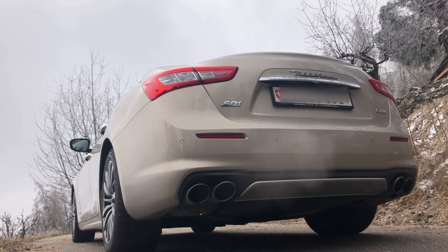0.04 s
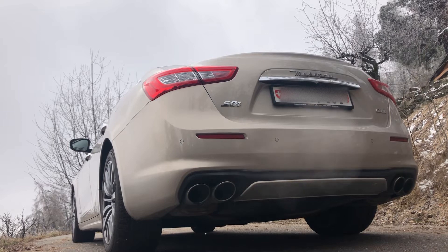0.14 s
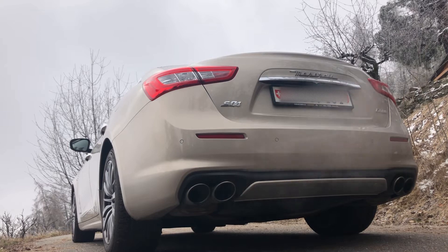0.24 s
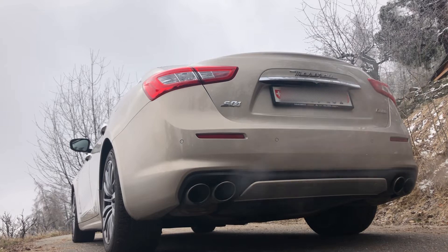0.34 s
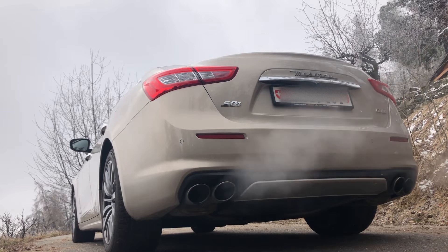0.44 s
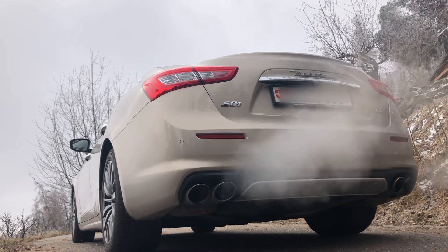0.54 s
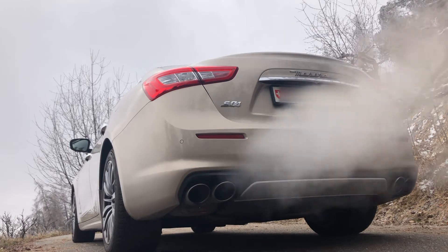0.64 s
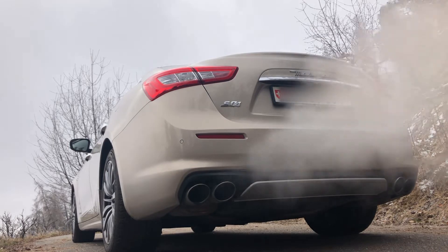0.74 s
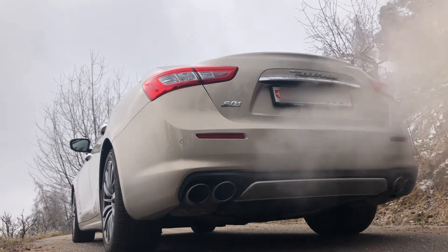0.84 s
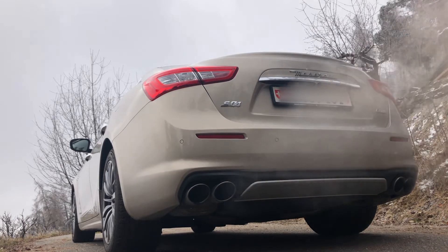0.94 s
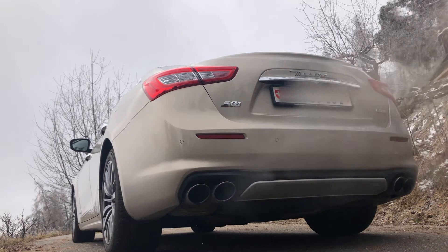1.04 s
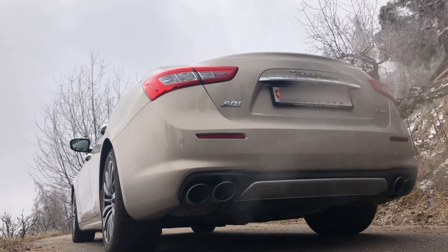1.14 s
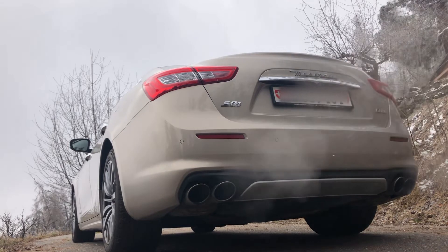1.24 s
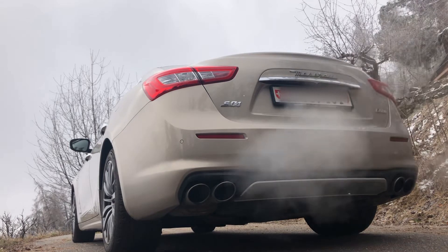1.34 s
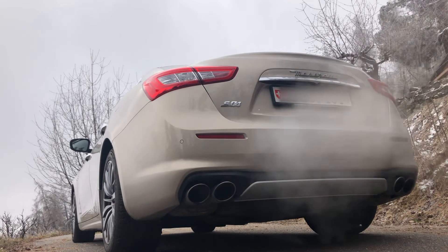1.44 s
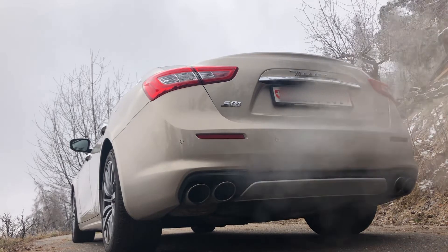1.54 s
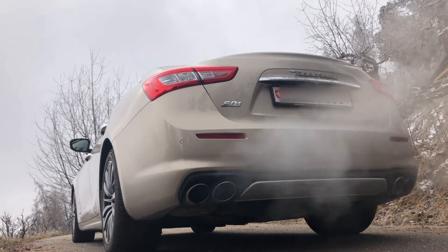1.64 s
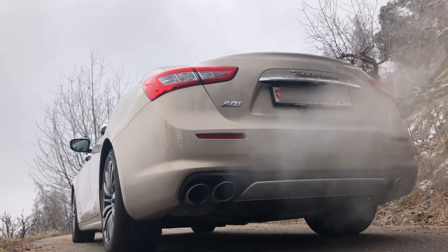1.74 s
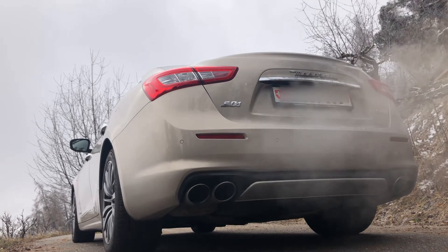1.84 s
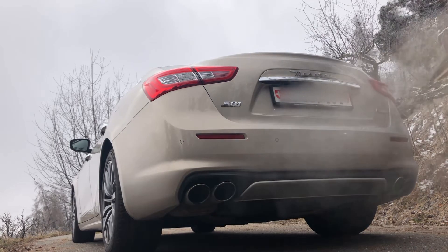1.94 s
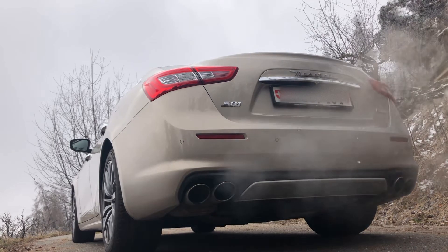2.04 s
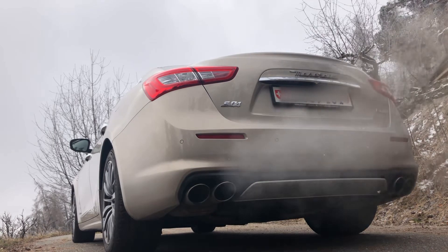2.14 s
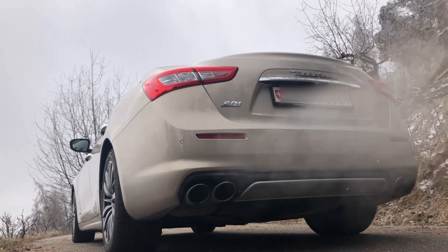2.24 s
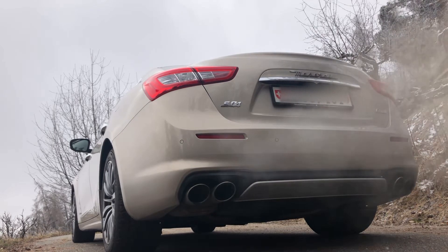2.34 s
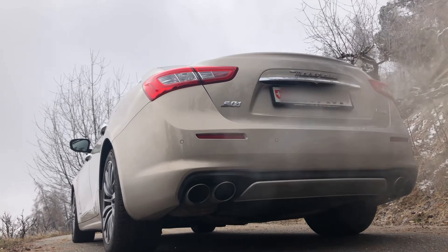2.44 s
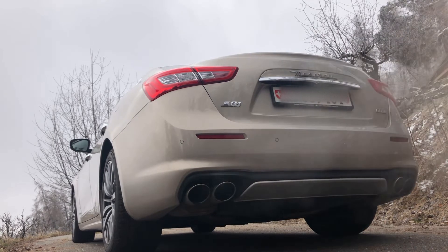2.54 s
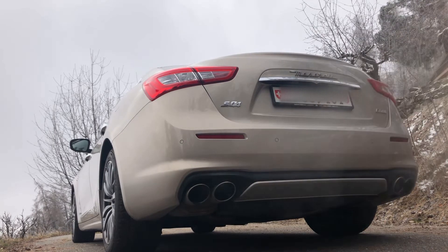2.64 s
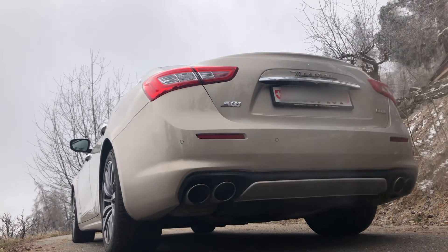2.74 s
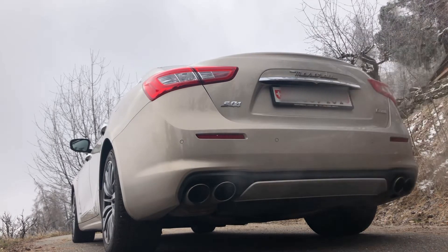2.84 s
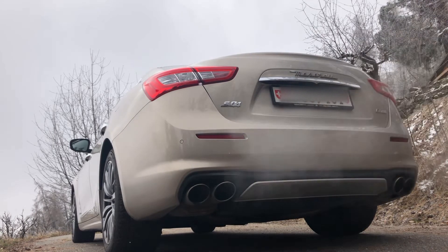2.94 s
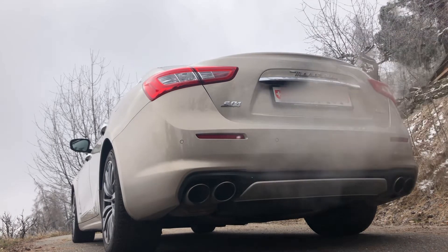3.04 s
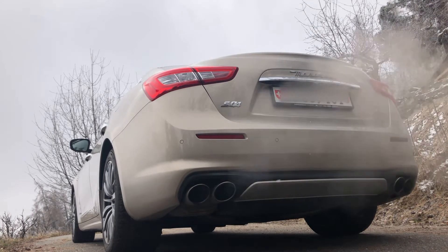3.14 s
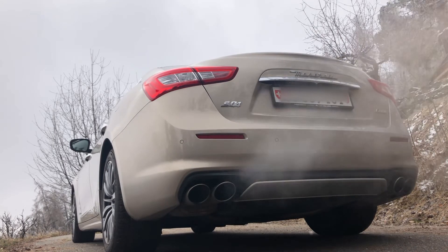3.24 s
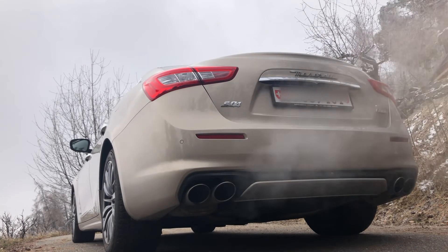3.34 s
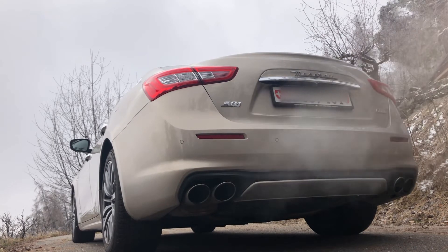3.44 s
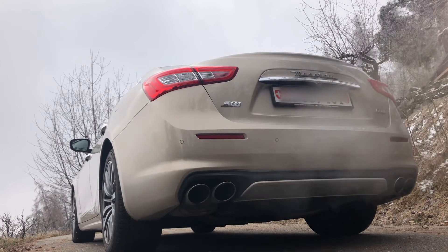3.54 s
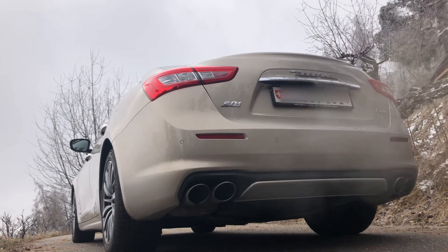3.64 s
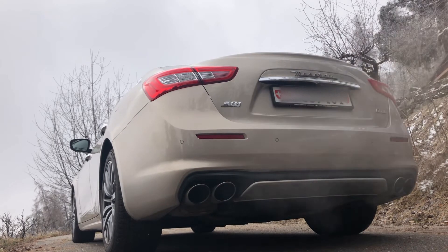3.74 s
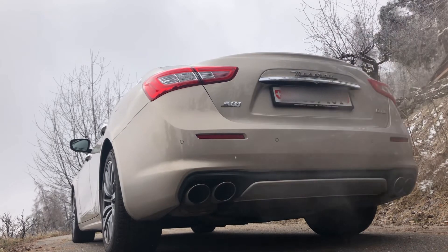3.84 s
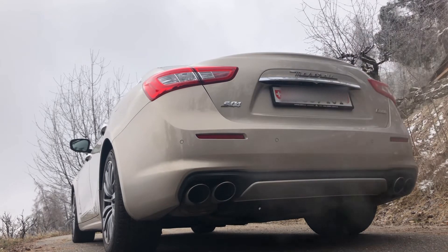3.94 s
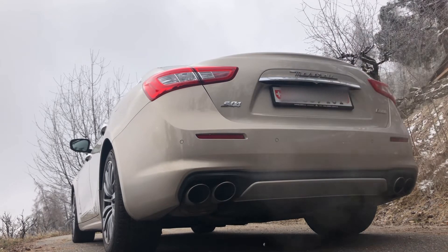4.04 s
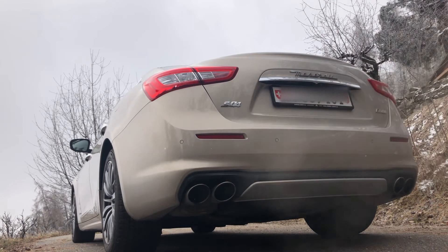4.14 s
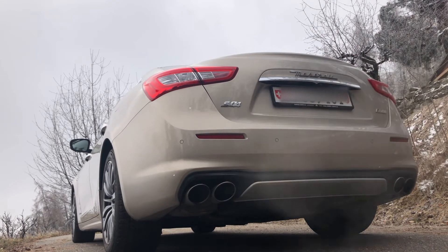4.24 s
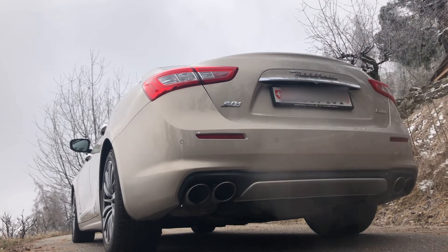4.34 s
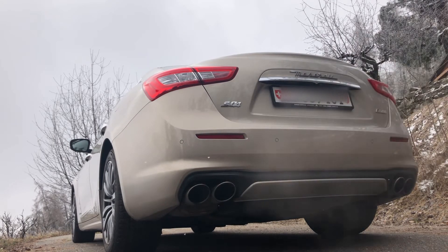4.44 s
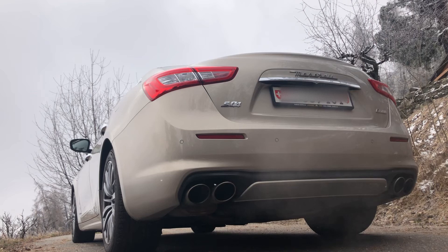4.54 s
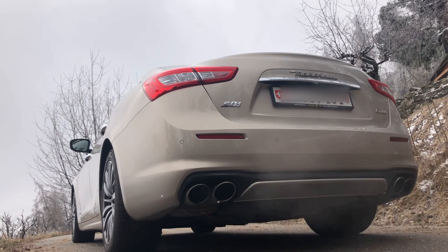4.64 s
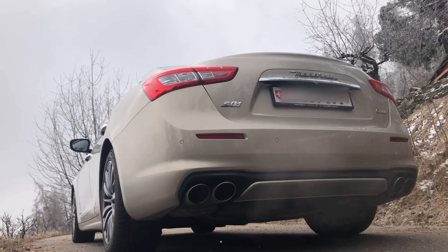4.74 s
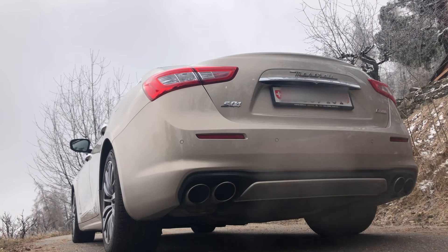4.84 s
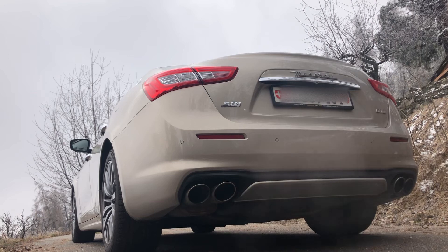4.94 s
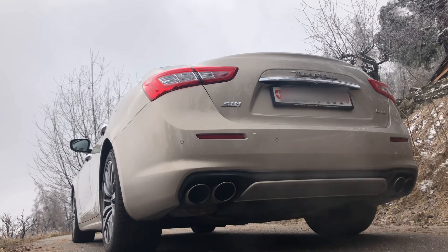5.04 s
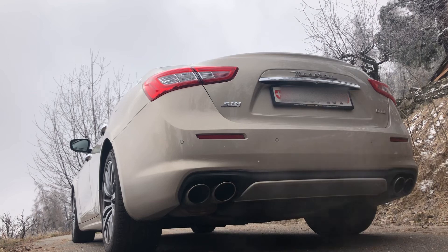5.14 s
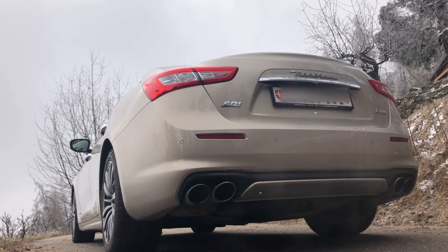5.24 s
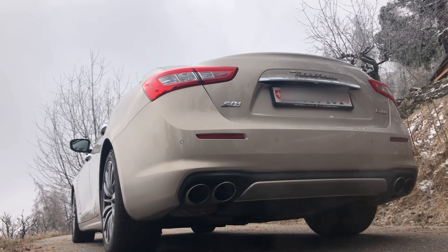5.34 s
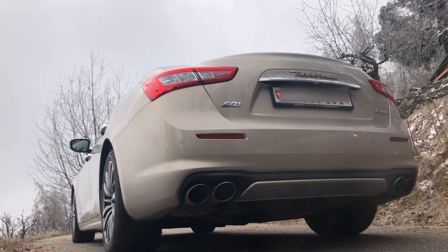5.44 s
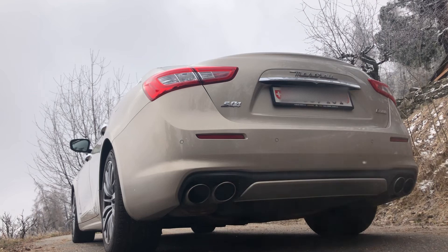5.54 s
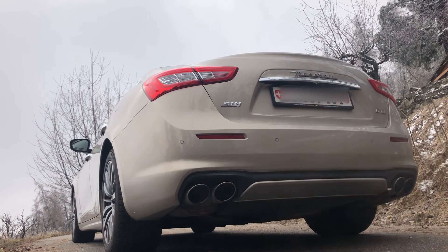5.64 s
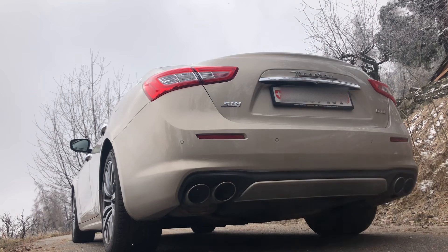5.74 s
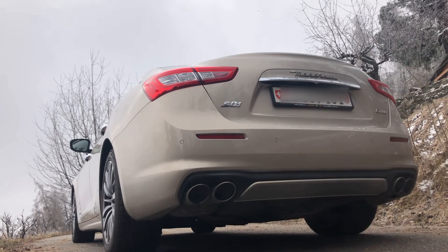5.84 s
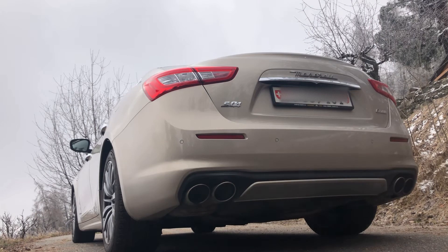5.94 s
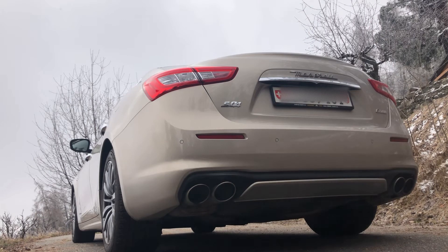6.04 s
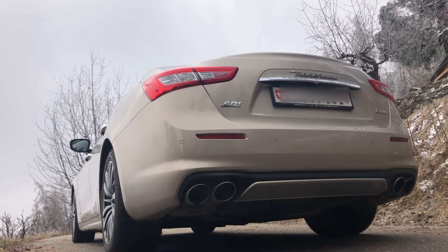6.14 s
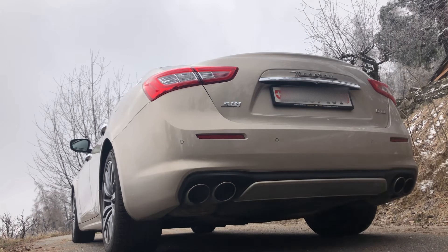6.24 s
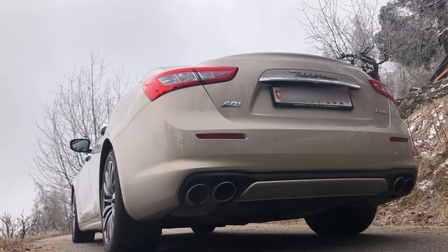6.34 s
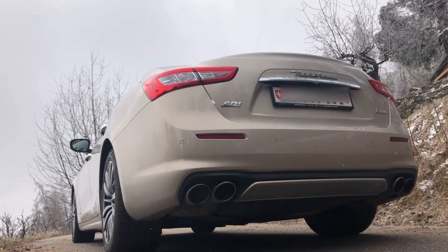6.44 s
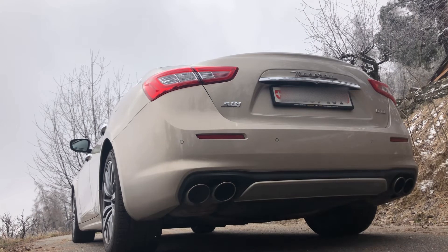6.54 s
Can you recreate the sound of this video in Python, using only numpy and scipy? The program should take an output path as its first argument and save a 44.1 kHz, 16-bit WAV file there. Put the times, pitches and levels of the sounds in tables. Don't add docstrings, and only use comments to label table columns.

```python
import sys
import numpy as np
from scipy import signal
from scipy.fft import rfft, irfft
from scipy.io import wavfile
from scipy.ndimage import uniform_filter1d

SR = 44100
rng = np.random.default_rng(int(sys.argv[2]) if len(sys.argv) > 2 else 0)


def output_pcm(signal):
    pcm = np.clip(np.atleast_2d(signal).T, -1, 1) * 32767
    wavfile.write(sys.argv[1], SR, np.round(pcm).astype(np.int16))


def level_to_linear(level):
    exponent = np.asarray(level, float) / 20
    return 10 ** exponent


N = 291060
TIME = np.arange(N) / SR

# frequency in Hz, level in dB.
AIR_SPECTRUM = [(25, -20), (60, -3), (800, -12), (3000, -22), (15000, -33)]
# time in seconds, firing rate of one bank in Hz.
BANK_RATE = [(0, 55.95), (.35, 93.76), (.51, 117.7), (.7, 116.6), (1.12, 95.5), (1.47, 127.4),
             (1.68, 125.5), (1.97, 112.2), (2.17, 127.9), (2.43, 125.9), (2.81, 110.6), (3.0, 125.9),
             (3.2, 128.5), (3.77, 101.8), (4.63, 70.11), (5.39, 47.61), (5.88, 33.41), (6.6, 36.33)]
# pedal down, rev cut starts, pedal up, all in seconds,
# pipe level at the start in dB, pipe level at the end in dB.
BLIPS = [
    (-.2, 0.626, 0.7, -14.5, -8),
    (1.122, 1.526, 1.685, -8.5, -13),
    (1.937, 2.24, 2.43, -8, -15),
    (2.778, 3.123, 3.235, -10, -12.5),
]
# peak in seconds, rise in seconds, size [0-1].
BOOST_SURGES = [
    (.63, 0.078, 0.25),
    (1.48, 0.078, 0.42),
    (2.19, 0.2, 0.46),
    (3.05, .16, 0.44),
]
# time in seconds, pipe level in dB, breath in dB, load of the idle governor [0-1].
FOOT_OFF = [(.7, -19, 0, 0.16), (1.9, -21, -0.03, 0), (2.75, -23, 0.1, 0), (3.3, -23, 0.6, .01),
            (4.3, -23.5, -0.5, 0.05), (4.74, -26.5, 2, .01), (5.13, -27.5, -2, 0.18), (5.4, -24, 0, 0.11),
            (5.75, -30, 8.5, 0.13), (5.86, -29, 3.5, 0.11), (5.91, -22.5, -10.5, 0.7),
            (6.3, -14.5, -8, 0.83), (6.54, -11, -6.5, 1), (6.6, -12, 2.5, 0.98)]
COASTING_FIRINGS = [-1.35, .75, .45, .45, .45, .75]
LOADED_FIRINGS = [1.7, 1.2, -.3, -1.1, -.3, -1.2]
# multiple of the bank rate, coasting level in dB, loaded level in dB relative
BOOM_TONES = [
    (1, -18.5, -40, .3),
    (2, -15.5, -9, 0.32),
    (3, -24, -25, .8),
    (4, -23, -2, 0.92),
    (6, -26, -11.5, 0.53),
]
# frequency in Hz, level in dB.
SILENCER_RESPONSE = [(35, -20), (49, 2.5), (84, -0.7), (95, -3.5), (106, 1.1), (154, -3.5), (172, -15.5),
                     (260, -11.5)]
# start in seconds, peak in dB, pitch in Hz, t60 in seconds.
PRESSURE_SURGES = [(0.671, -11.5, 67.7, 0.14), (0.689, -18.5, 53.3, 0.16), (1.119, -26, 77.45, 0.16),
                   (1.538, -21, 103.4, 0.11), (1.571, -12.5, 97, 0.096), (1.64, -11, 65.6, 0.048),
                   (1.67, -14, 90.8, 0.051), (1.953, -29, 82.85, 0.14), (2.26, -21.5, 73, 0.16),
                   (2.309, -18.5, 71.3, 0.15), (2.39, -21, 63, 0.17), (2.428, -16, 59.75, 0.091),
                   (2.788, -31, 59.03, 0.16), (3.169, -33, 67.33, 0.15), (3.225, -21.5, 62.4, 0.18)]
# time in seconds, crack peak in dB, pipe ring in dB relative to it,
# misfire dip just before in dB.
LATE_BURNS = [(0.256, -28, -5, -1.5), (0.6428, -3.5, 5, -1), (0.6571, -12, 14, -9), (0.6708, -11.5, 6, -43),
              (1.202, -15.5, -5, 0), (1.2333, -23, 7, 0), (1.513, -7.5, 14, -3.5), (1.5599, -5, -19, -12),
              (1.5777, -5.5, 12.5, -3), (1.5984, -7, 5, -6), (1.6132, -6.5, 11.5, -3), (1.6314, -9, -8, 0),
              (1.641, -7.5, 10, 0), (1.957, -17, -9, 0), (2.0081, -7.5, 10, -5.5), (2.0334, -7, -7, -2.5),
              (2.2277, -5.5, 6, 0), (2.2713, -4, 8, -9), (2.2982, -6.5, 9.5, -5), (2.323, -3, 8.5, 1),
              (2.369, -5.5, -20, 0.5), (2.413, -6.5, 10, -12.5), (2.799, -21, 18, 0),
              (2.8362, -9.5, 1, 0.5), (2.8542, -11, 10, 0), (2.88, -8.5, -17, 0), (3.145, -3, 9, 0),
              (3.1927, -6.5, 3, 0), (3.229, -13, 11, -2), (6.572, -32, 26, -2.5)]
# centre in Hz, width in Hz, level under load in dB, change when coasting in dB.
PIPE_MODES = [(94.6, 69, -22.5, 13), (156.3, 31, -19.5, 7.5), (216.5, 43, -24, 9.5), (284, 37, -13.5, -17),
              (348, 34.7, -3.5, 9.5), (440.6, 94, -8, 4.5), (513, 59, -1.5, 0.5), (577, 41.7, 2, 1),
              (653.4, 59.3, 2, -1), (674.1, 64.4, -1, 2.5), (755, 138, -14, -7)]
# centre in Hz, width in Hz, level under load in dB, change when coasting in dB.
RASP_MODES = [(1006, 222, -0.5, 2.2), (1164, 163, 3.5, 0.1), (1452, 184, 3, 1.7), (1652, 181, 3, -4),
              (1890, 180, -17.5, 6.8), (2092, 190, -4, -4)]
# centre in Hz, width in Hz, level under load in dB, change when coasting in dB.
GAS_MODES = [(2355, 570, -7.5, 1), (3149, 416, -0.5, 3), (3820, 460, -8, 3), (4165, 265, -7, 7.5),
             (4600, 376, 2, -1.5), (5277, 600, -4, 8), (6005, 440, -9.5, 7.5), (6700, 940, -23.5, 14.5)]
# frequency in Hz, density in dB per Hz.
HISS_SPECTRUM = [(3820, -29), (6500, -11), (7220, -15.5), (9840, -17.5), (11000, -16.5), (12900, -25.5),
                 (15100, -23.5), (16000, -23)]
# time in seconds, centre in Hz, level in dB relative to the gas.
TURBINE_WHINE = [(0, 5700, -8), (.15, 5585, -8.5), (.45, 5160, 2), (.65, 5200, -6), (3.3, 5970, -38),
                 (3.6, 6190, -7), (3.9, 6700, -5.5), (4.4, 5393, -5), (4.8, 5123, -22)]
# foot-off level in dB, share of the breath, level with the throttle
# just open in dB, gain at full boost in dB; levels relative to the pipe.
JET_LAYERS = [
    (-14, 0.76, -9, 2),
    (-23, 0.71, -31, 23),
    (-28.5, 0.56, -48.5, 35),
]

AIR_DB = -60
OPEN_S, SHUT_S, SPOOL_S, CUT_S = 0.032, 0.038, 0.042, 0.02
BOOST_PLATEAU = 0.56
BOOM_TOP_HZ, BOOM_SAG_DB_PER_HZ, IDLE_HZ = 218, .5, 35.5
THROTTLE_BOOM_DB, EVENED_DB = -6.5, -21
GULP_S, GULP_WIDTH_S, GULP_HISS_DB, GULP_BOOM_DB = 5.43, 0.12, 6, -8
SPIT_DB, SPIT_GROWTH, SPIT_BOOST_DB = -15, 1.3, 26
STRONG_FIRING_S = 6.171


def curves(table):
    s, *columns = np.transpose(table)
    return [np.interp(TIME, s, c) for c in columns]


def ramp(start_s, span_s):
    return np.clip((TIME - start_s) / span_s, 0, 1)


def ring(x, hz, width):
    pole = signal.iirpeak(hz, hz / width, fs=SR)
    return signal.lfilter(*pole, signal.lfilter(*pole, x))


def body(x, modes, coasting=0):
    out = 0
    for k, (hz, width, db, off_db) in enumerate(modes):
        out = out + (-1) ** k * level_to_linear(db + coasting * off_db) * ring(x, hz, width)
    return out


def band(x, lo_hz, hi_hz):
    return signal.sosfilt(signal.butter(2, [lo_hz, hi_hz], "bandpass", fs=SR, output="sos"), x)


def coloured(x, spectrum):
    hz, db = np.transpose(spectrum)
    gain_db = np.interp(np.log(np.fft.rfftfreq(N, 1 / SR) + 1), np.log(hz), db)
    return irfft(rfft(x) * level_to_linear(gain_db), N)


def steady(x, span_s=0.09):
    k = int(span_s * SR)
    power = uniform_filter1d(uniform_filter1d(x ** 2, k), k)
    return x / np.sqrt(power + 1e-12)


def clicks(times, sizes):
    at = np.clip(times * SR, 0, N - 2)
    i = at.astype(int)
    return np.bincount(i, sizes * (1 - at + i), N) + np.bincount(i + 1, sizes * (at - i), N)


def fade(x, tau_s):
    return signal.lfilter([1], [1, -np.exp(-1 / (tau_s * SR))], x)


def gulp(width_s):
    return np.exp(-((TIME - GULP_S) / width_s) ** 2)


def open_air():
    return level_to_linear(AIR_DB) * steady(coloured(rng.standard_normal(N), AIR_SPECTRUM), span_s=1)


def bank_echo(x, t60_s=0.1, db=-16):
    age = TIME[:SR // 2]
    decay = np.exp(-np.log(1000) * age / t60_s) * (age > .006)
    tail = band(rng.standard_normal(len(age)), 147, 2740) * decay
    return x + level_to_linear(db) * signal.fftconvolve(x, tail / np.sqrt(np.sum(tail ** 2)))[:N]


def pedal():
    pipe_db, breath_db, governor = curves(FOOT_OFF)
    throttle, cut, boost = np.zeros((3, N))
    for (down, cuts, up, start_db, end_db), (peak, rise, size) in zip(BLIPS, BOOST_SURGES):
        on = ramp(down, OPEN_S) * (1 - ramp(up - SHUT_S / 2, SHUT_S))
        spool = 1 - np.exp(-np.clip(TIME - down - OPEN_S, 0, None) / SPOOL_S)
        surge = size * ramp(peak - rise, rise) * (1 - ramp(peak, up - peak))
        throttle = throttle + on
        cut = cut + on * ramp(cuts, CUT_S)
        boost = boost + on * spool * (BOOST_PLATEAU + surge)
        blip_db = start_db + (end_db - start_db) * ramp(down, up - down)
        pipe_db = pipe_db + on * (blip_db - pipe_db)
    return throttle, cut, boost, pipe_db, breath_db, np.clip(governor, 0, 1)


def burn(hz, throttle, cut, boost, governor):
    slow = np.clip((75 - hz) / 25, 0, 1)
    coasting = 1 - governor - throttle * (.72 + .14 * boost - .05 * cut)
    far_db = -4 + slow + 1.5 * governor - throttle * (6 + 5 * boost - 3 * cut)
    scatter_db = .7 + 2.8 * slow * coasting * (1 - throttle) + 1.3 * governor
    scatter_db = scatter_db + throttle * (1.8 - 1.1 * boost + 2.6 * cut)
    puffy = .3 - .15 * slow + .22 * governor + throttle * (.5 - .1 * boost)
    return far_db, coasting, scatter_db, puffy


def boom(turns, hz, load, pipe_db):
    out = 0
    tone_hz, tone_db = np.transpose(SILENCER_RESPONSE)
    lags = (0., .1, .2, .35, .6)
    for (order, off_db, on_db, share), lag in zip(BOOM_TONES, lags):
        coasting_db = off_db - BOOM_SAG_DB_PER_HZ * (hz - IDLE_HZ)
        db = coasting_db + load * (on_db + share * pipe_db - coasting_db)
        db = db + np.interp(np.log(order * hz), np.log(tone_hz), tone_db)
        db = db + EVENED_DB * (round(order) != 2) * ramp(GULP_S, 0.15) * (1 - load)
        passed = 1 / np.sqrt(1 + (order * hz / BOOM_TOP_HZ) ** 8)
        tone = np.cos(2 * np.pi * (round(order) * turns - lag))
        out = out + np.sqrt(2) * level_to_linear(db) * passed * tone
    return out


def thumps():
    out = np.zeros(N)
    for t, db, hz, t60 in PRESSURE_SURGES:
        age = np.clip(TIME - t, 0, 1)
        swell = (1 - np.exp(-age / 0.011)) * np.exp(-np.log(1000) * age / t60)
        tone = np.sin(2 * np.pi * hz * age) + 0.34 * np.sin(2.306 * 2 * np.pi * hz * age)
        out += level_to_linear(db + 8) * swell * tone
    return out


def misfires(lead_s=0.0066):
    times, *_, dip_db = np.transpose(LATE_BURNS)
    total_db = 0
    for t, db in zip(times, dip_db):
        total_db = total_db + min(db, 0) * np.exp(-((TIME - t + lead_s) / 0.0096) ** 2)
    return level_to_linear(total_db)


def twice(times, db):
    return clicks(times, level_to_linear(db)) + clicks(times + .0045, level_to_linear(db - 3.5))


def pops(boost):
    times, crack_db, ring_db, _ = np.transpose(LATE_BURNS)
    noise = rng.standard_normal(N)
    burst = fade(twice(times, crack_db), .0024) * noise
    spit_db = SPIT_GROWTH * crack_db + SPIT_DB + SPIT_BOOST_DB * (np.interp(times, TIME, boost) - .8)
    spit = fade(twice(times, spit_db), 0.0025) * noise
    crack = level_to_linear(4.5) * body(burst, GAS_MODES) + level_to_linear(7.5) * body(burst, RASP_MODES)
    crack = crack + level_to_linear(2.5) * band(spit, 5900, 15000)
    kick = clicks(times, level_to_linear(crack_db + ring_db))
    return crack + level_to_linear(33) * body(kick, PIPE_MODES)


def whine(width_hz=350):
    hz, db = curves(TURBINE_WHINE)
    slow = [band(rng.standard_normal(N), 3.2, width_hz) for _ in range(2)]
    turn = 2 * np.pi * np.cumsum(hz) / SR
    return level_to_linear(db) * steady(slow[0] * np.cos(turn) + slow[1] * np.sin(turn))


def firings(turns, burning):
    k = np.arange(int(np.floor(2 * turns[0])), int(2 * turns[-1]))
    times = np.interp(k / 2, turns, TIME)
    gap_s = np.gradient(times)
    far_db, coasting, scatter_db, _ = (np.interp(times, TIME, c) for c in burning)
    chance = np.clip(rng.standard_normal((len(k), 3)).T, -1.8, 1.8)
    even = np.clip((gap_s - .005) / .005, 0, .33)
    lugging = (1 - coasting) * np.clip((gap_s - .01) / .004, 0, 1)
    loaded = level_to_linear(far_db * (k % 2))
    coasted = even + (1 - even) * np.array(COASTING_FIRINGS)[k % 6]
    pattern = (1 - coasting) * loaded + coasting * coasted
    lump = (1 - coasting) * (.5 + 1.5 * lugging) * np.array(LOADED_FIRINGS)[k % 6]
    sizes = pattern * level_to_linear(scatter_db * ((1 - .55 * lugging) * chance[0] + lump))
    late_s = .005 * gap_s * scatter_db * chance[1]
    shadow = level_to_linear(.7 * far_db * (1 - coasting) * (k % 2))
    gusts = level_to_linear(1.1 * chance[2])
    return times + late_s, sizes, shadow, gusts


def exhaust(turns, pipe_db, layers_db, burning):
    rasp_db, gas_db, hiss_db = layers_db
    _, coasting, _, puffy = burning
    times, sizes, shadow, gusts = firings(turns, burning)
    pulses = clicks(times, sizes)
    fronts = clicks(times, sizes / shadow * gusts)
    puffs = steady(fade(np.abs(fronts), .0018))
    jet = [rng.standard_normal(N) * (puffy * puffs + 1 - puffy) for _ in range(4)]

    turbulence = level_to_linear(-8.5 - 7.5 * coasting) * steady(body(jet[0], PIPE_MODES, coasting))
    pipe = steady(steady(body(pulses, PIPE_MODES, coasting)) + turbulence)

    grit = level_to_linear(-3 + 3 * coasting) * steady(body(jet[1], RASP_MODES, coasting))
    rasp = steady(band(steady(body(pulses + fronts, RASP_MODES, coasting)) + grit, 630, 4000))

    snap = puffy ** 2 * steady(body(fronts, GAS_MODES, coasting))
    rush = steady(body(jet[2], GAS_MODES, coasting))
    gas = steady(band(snap + rush, 1740, 15000)) + whine()

    hiss = steady(coloured(jet[3] + 1.04 * rng.standard_normal(N), HISS_SPECTRUM))
    buffet = level_to_linear(-25 - 26 * coasting) * steady(band(rng.standard_normal(N), 30, 90), span_s=.6)
    jet_layers = level_to_linear(rasp_db) * rasp + level_to_linear(gas_db) * gas + level_to_linear(hiss_db) * hiss
    return level_to_linear(pipe_db) * (pipe + jet_layers + buffet)


def scene():
    hz, = curves(BANK_RATE)
    turns = np.cumsum(hz) / SR
    turns = turns + -turns[int(STRONG_FIRING_S * SR)] % 3
    throttle, cut, boost, pipe_db, breath_db, governor = pedal()
    burning = burn(hz, throttle, cut, boost, governor)

    layers_db = []
    for off, share, on, gain in JET_LAYERS:
        layers_db.append(off + share * breath_db + throttle * (on - off) + gain * boost)
    layers_db[2] = layers_db[2] + GULP_HISS_DB * gulp(GULP_WIDTH_S)

    load = np.clip(throttle + np.clip((governor - .14) / 0.19, 0, 1), 0, 1)
    boom_db = THROTTLE_BOOM_DB * throttle + GULP_BOOM_DB * gulp(0.037)
    low = boom(turns, hz, load, pipe_db) * level_to_linear(boom_db) + thumps()
    near = exhaust(turns, pipe_db, layers_db, burning) * misfires() + pops(boost)
    return (open_air() + low + bank_echo(near))[None]


def low_pass(x):
    return signal.sosfilt(signal.butter(12, 16880, fs=SR, output="sos"), x)


def record(dry):
    rounded = .95 * np.tanh((1 + (dry / 1.8) ** 2) * dry / .95)
    top_cut = signal.ellip(8, .2, 40, 15850, fs=SR, output="sos")
    return low_pass(signal.sosfilt(top_cut, rounded))


dry = scene()
out = record(dry)
output_pcm(out)
```